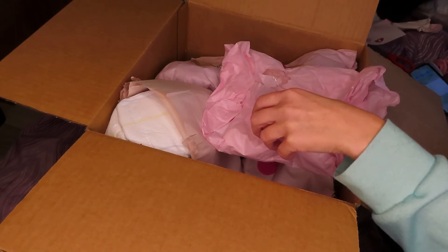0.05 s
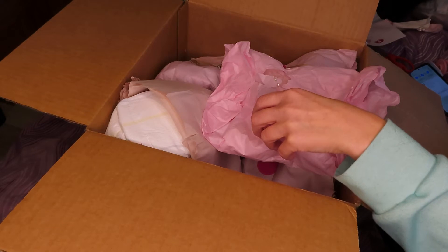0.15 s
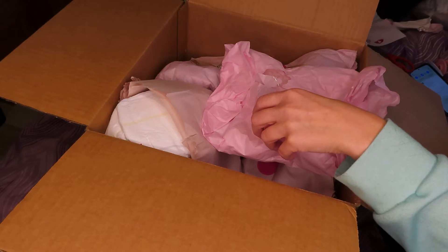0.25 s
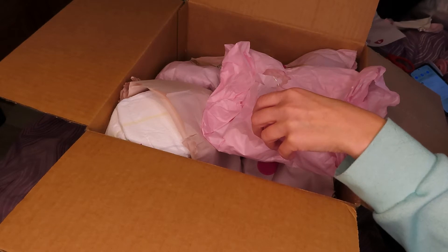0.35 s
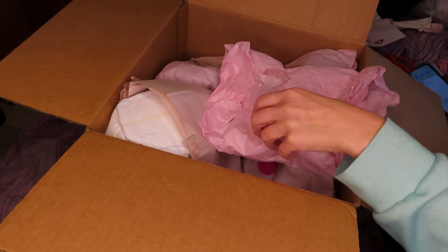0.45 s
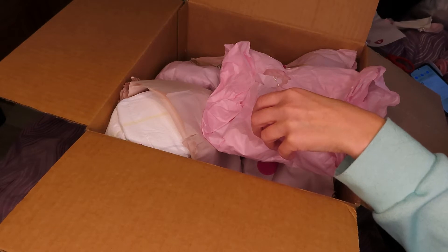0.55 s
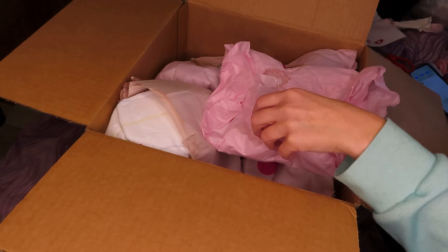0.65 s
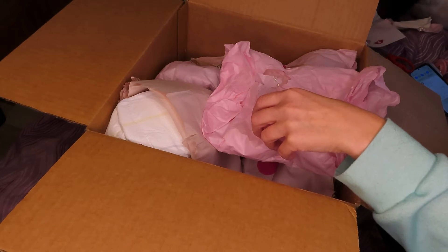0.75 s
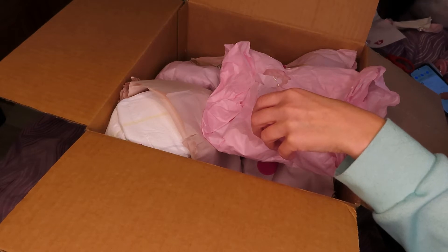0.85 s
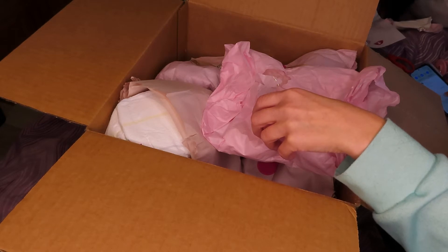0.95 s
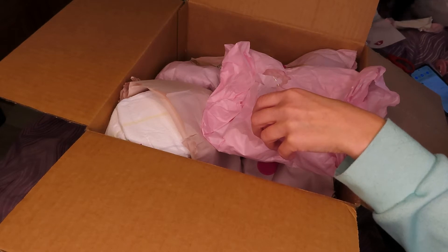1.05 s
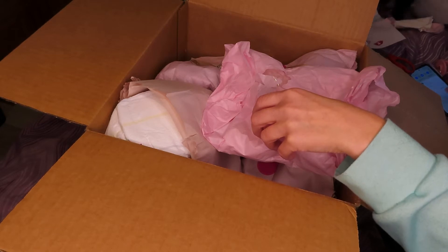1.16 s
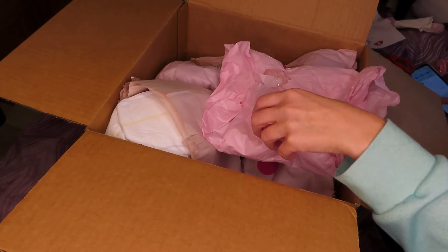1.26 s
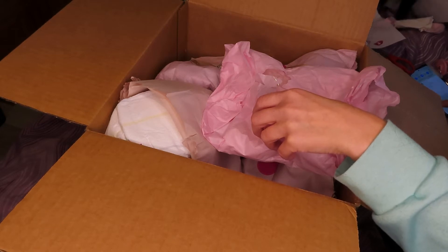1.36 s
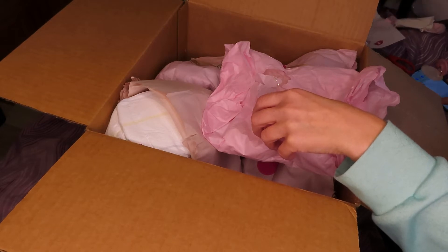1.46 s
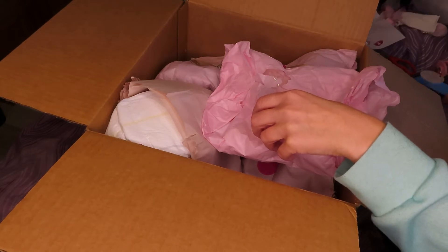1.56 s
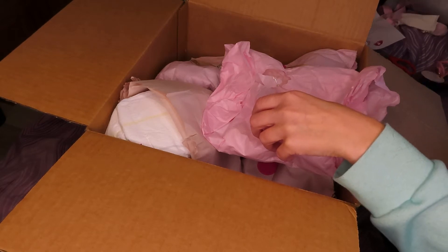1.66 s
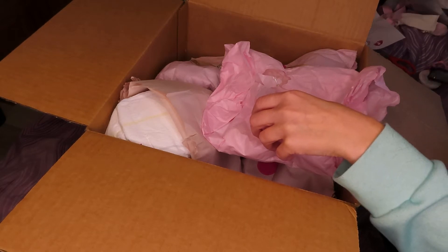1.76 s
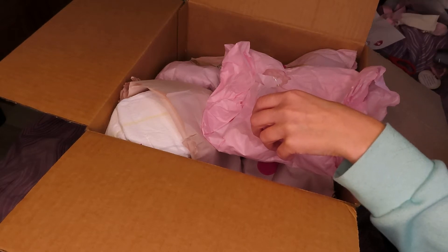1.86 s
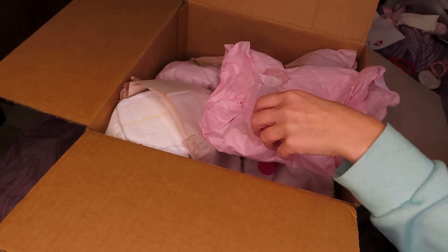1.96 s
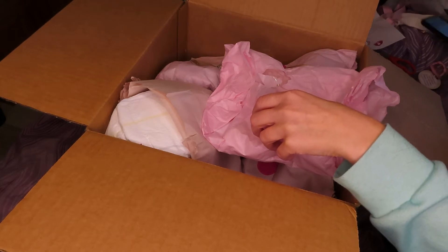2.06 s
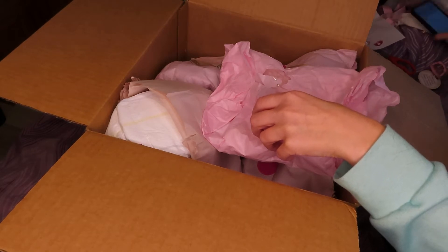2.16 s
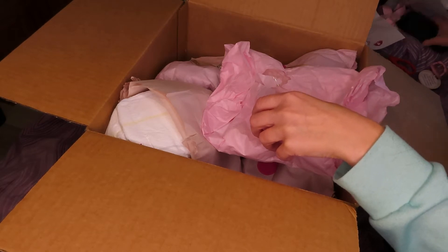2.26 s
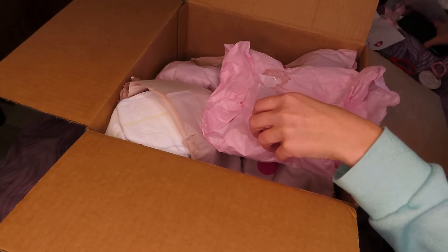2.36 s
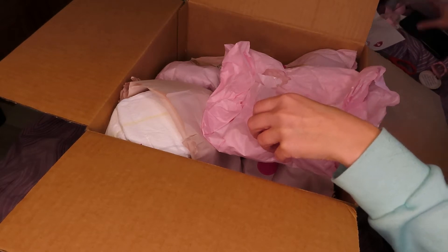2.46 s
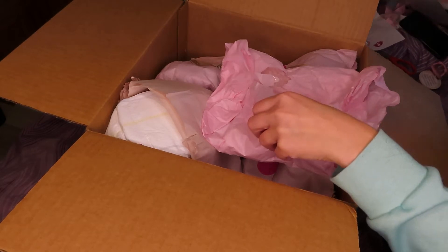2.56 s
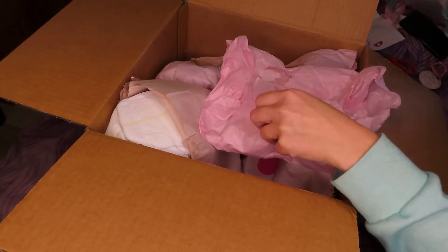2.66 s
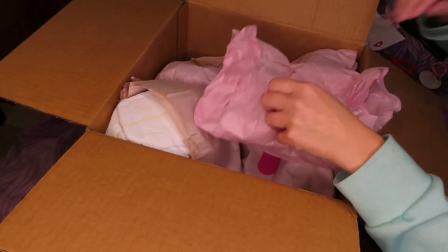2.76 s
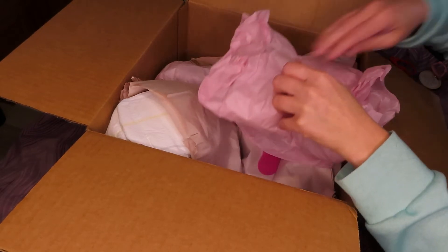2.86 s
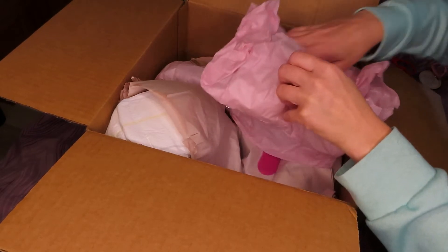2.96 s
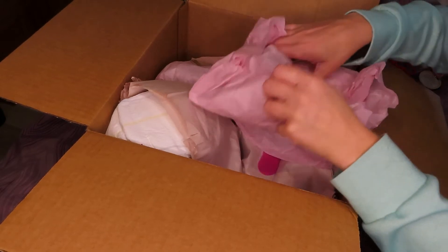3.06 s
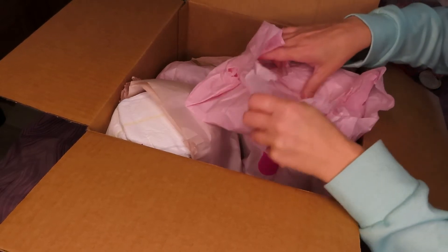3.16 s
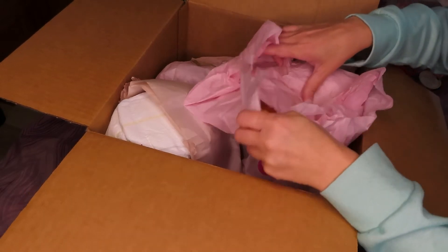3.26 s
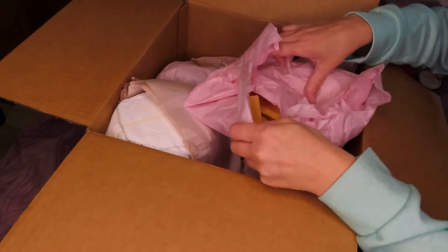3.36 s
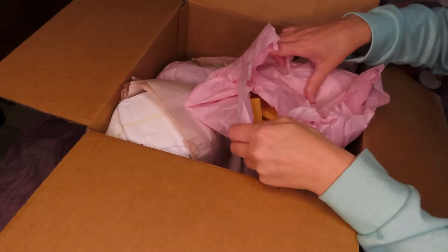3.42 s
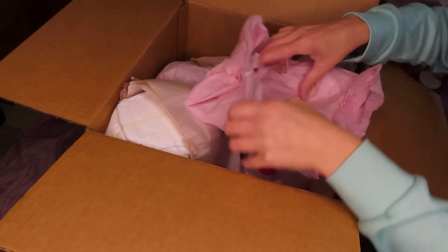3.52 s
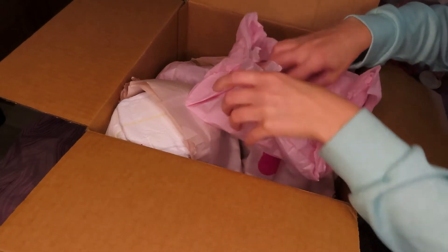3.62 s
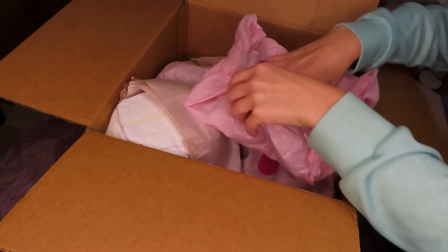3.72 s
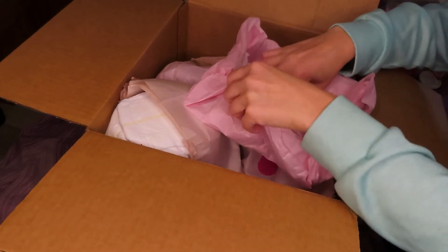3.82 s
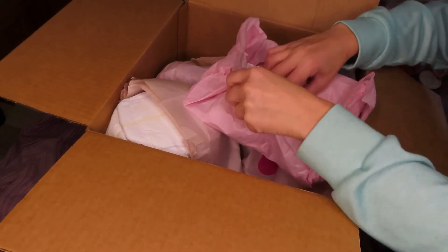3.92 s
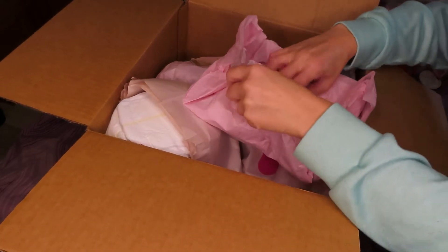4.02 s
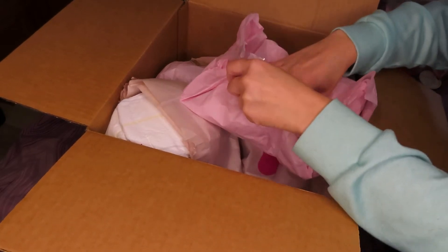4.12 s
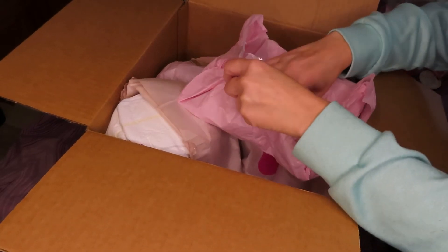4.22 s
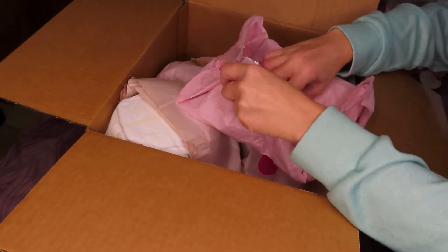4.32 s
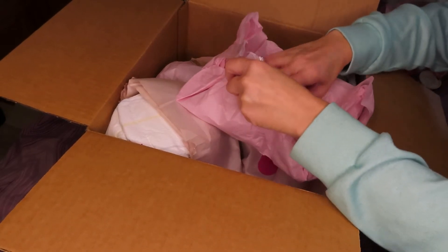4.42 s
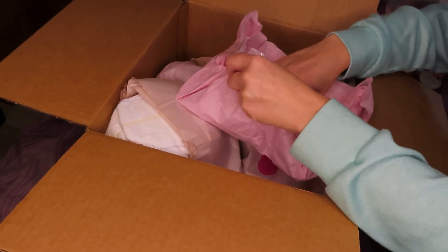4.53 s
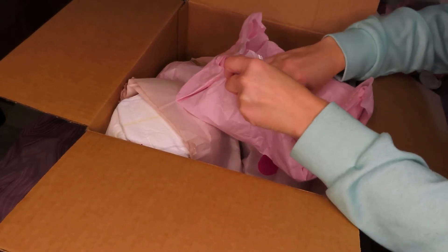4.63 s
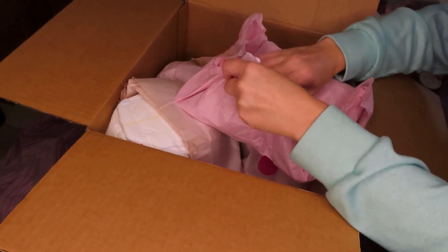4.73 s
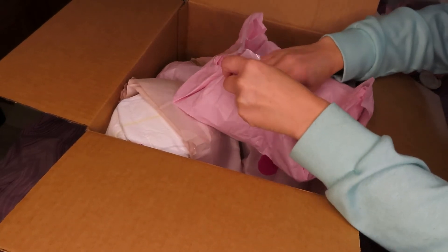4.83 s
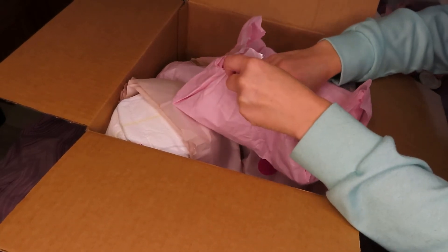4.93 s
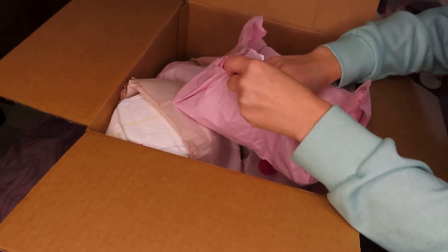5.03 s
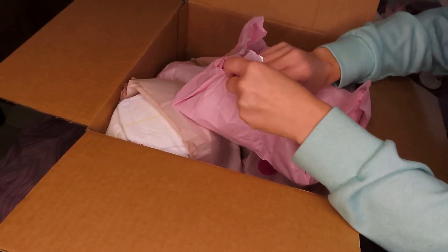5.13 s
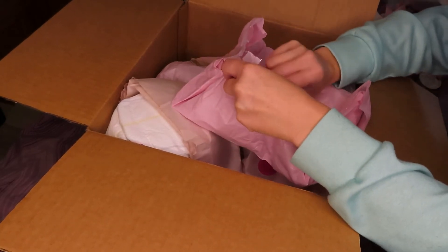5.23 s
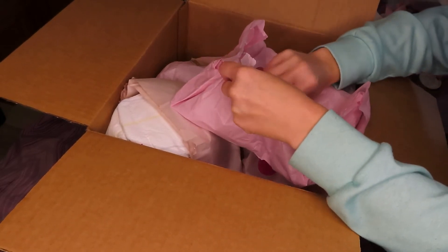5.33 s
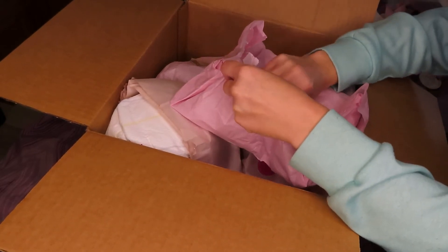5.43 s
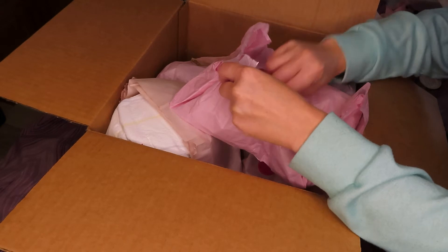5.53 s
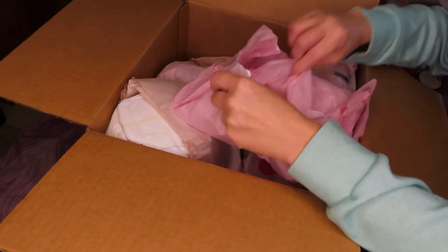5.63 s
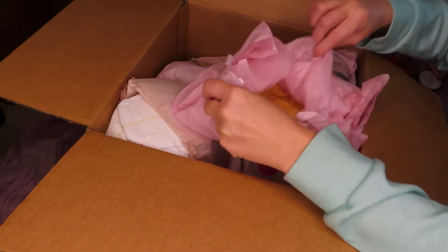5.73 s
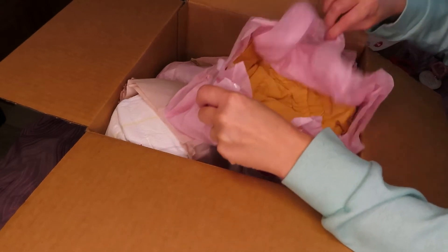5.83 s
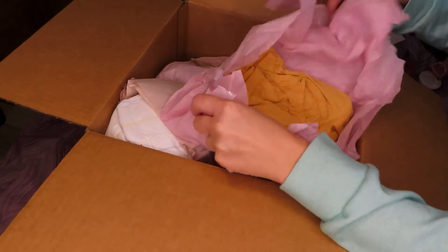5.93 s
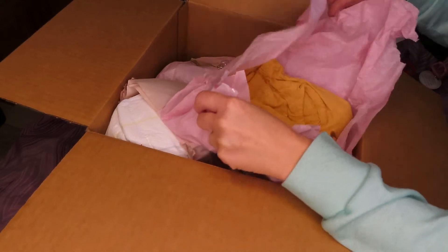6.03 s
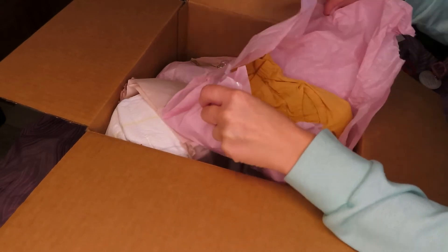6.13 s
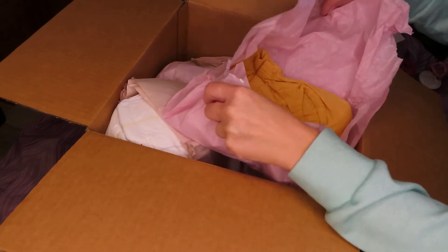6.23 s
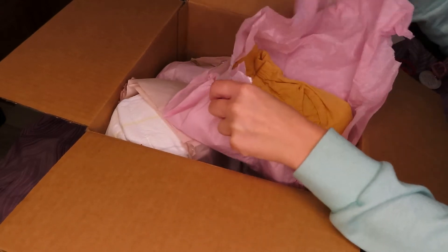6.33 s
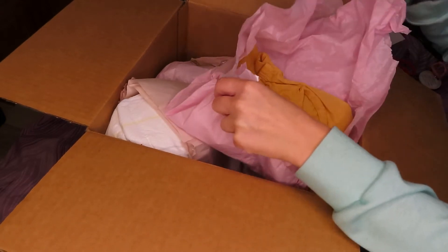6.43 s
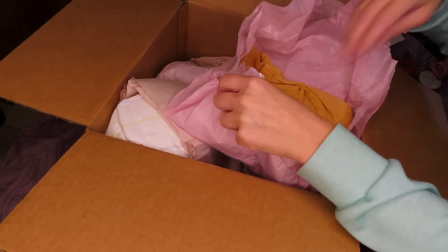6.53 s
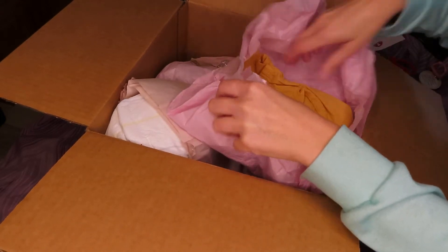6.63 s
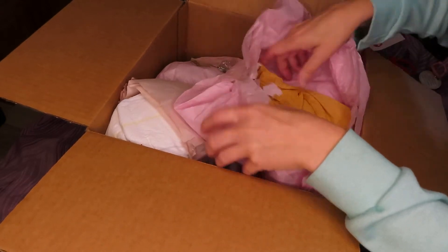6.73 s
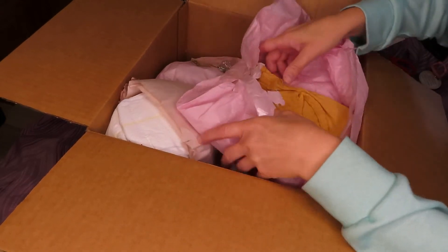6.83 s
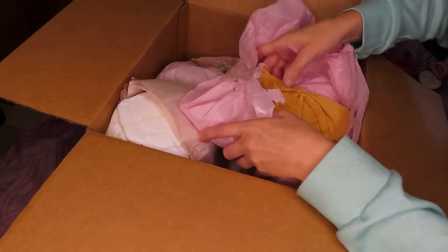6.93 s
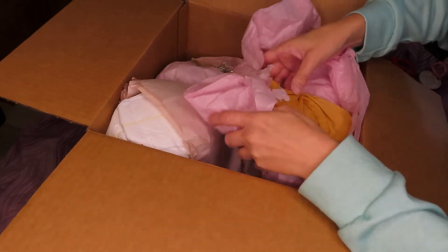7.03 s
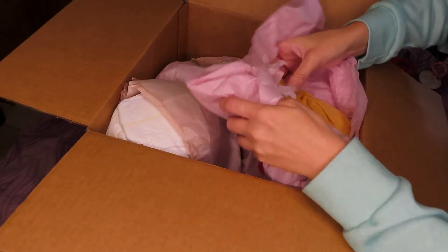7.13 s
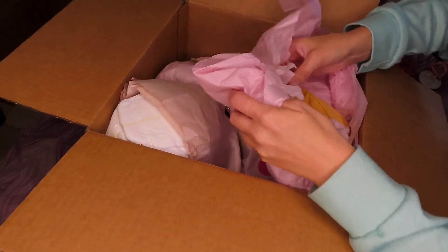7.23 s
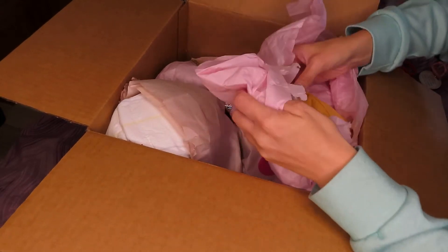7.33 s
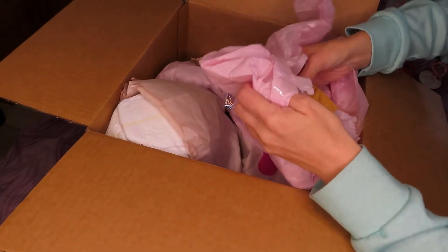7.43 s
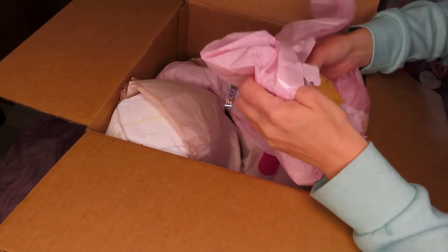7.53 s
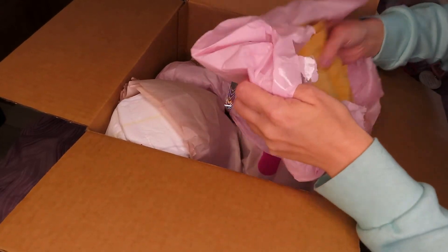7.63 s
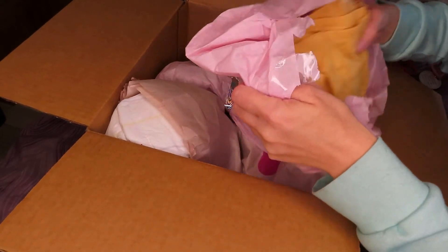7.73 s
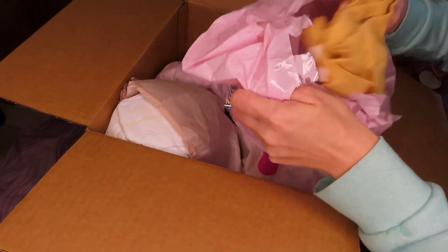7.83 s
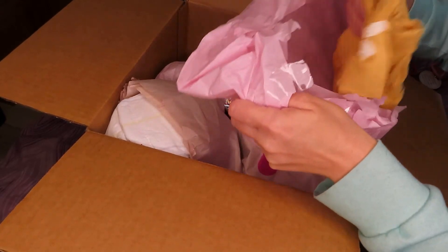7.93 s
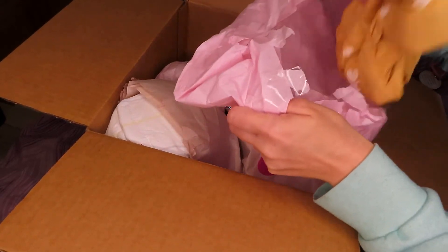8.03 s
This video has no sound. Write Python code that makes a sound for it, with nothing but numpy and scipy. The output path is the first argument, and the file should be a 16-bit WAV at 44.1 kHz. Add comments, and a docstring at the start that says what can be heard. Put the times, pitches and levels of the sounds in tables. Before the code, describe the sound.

In a quiet room with a faint hum and microphone hiss, tissue paper gives a few small crackles and there are some soft, dull knocks. Then hands start pulling and crumpling the paper inside a cardboard box, and it rustles loudly in one burst after another, dotted with crisp snaps, up to the end. The sound is close, with very little echo.

```python
"""A close rustle of tissue paper, crumpled and pulled by hand in a cardboard box, indoors.
Creases buckle in clumps, each a short burst, dull or bright; a few snap out singly.
Box and room smear the bursts together. A few dull bumps sound nearby.
Microphone hiss and a faint room hum lie under all."""
import sys
import numpy as np
from scipy import signal
from scipy.fft import rfft, irfft, next_fast_len
from scipy.io import wavfile
from scipy.ndimage import map_coordinates

SR = 44100
rng = np.random.default_rng(int(sys.argv[2]) if len(sys.argv) > 2 else 0)


def log_audio(samples):
    """Write samples as a 16-bit WAV file to the path given in sys.argv[1]."""
    # one column per channel
    frames = np.atleast_2d(samples).T
    # limit to full scale, then quantise
    limited = np.clip(frames, -1, 1)
    pcm = np.round(limited * 32767).astype(np.int16)
    wavfile.write(sys.argv[1], SR, pcm)


N = 356230

# Grips and pulls: full_at_s, hold_s, crackle_db, swell_s, fade_s, body_re_crackle_db, fizz_re_crackle_db
GRIPS = [(1.6, 0.025, -43.5, 0.049, 0.16, -6, -10.5), (1.765, 0.0084, -51.5, .08, 0.042, -5, -12),
         (1.845, .01, -48.5, .05, .2, -12, -17), (2.45, 0.062, -43, 0.13, .1, -3.5, -13),
         (2.545, .05, -36, 0.031, .3, -6, -7), (2.65, 0.019, -28.5, 0.12, 0.15, -7, -8.5),
         (2.8, 0.056, -24, 0.27, 0.3, -6, -7), (3.029, 0.07, -14, .06, 0.11, -7.5, -6.5),
         (3.19, .03, -18, 0.15, .4, -7.5, -6), (3.329, 0.029, -18.5, 0.073, 0.11, -6, -5.5),
         (3.58, 0.062, -23.5, 0.18, 0.061, -8, -5.5), (3.779, 0.1, -21, 0.19, 0.095, -5.5, -7),
         (3.95, 0.11, -27.5, 0.29, 0.4, -5.5, -7), (4.119, .17, -22.5, 0.11, 0.22, -5.5, -8),
         (4.508, .18, -23, 0.084, 0.13, -5, -8), (4.78, 0.017, -33, .2, 0.24, -8, -8),
         (4.919, 0.067, -22.5, 0.19, 0.21, -6, -8.5), (5.14, .02, -28, 0.055, 0.15, -7, -7.5),
         (5.33, .01, -35.5, 0.17, 0.062, -3, -2), (5.421, 0.059, -25.5, 0.16, .15, -6, -9),
         (5.66, 0.19, -16, 0.14, 0.26, -8, -7), (5.92, 0.096, -19.5, 0.18, 0.24, -7.5, -5.5),
         (6.055, 0.034, -20, .08, 0.053, -9.5, -4.5), (6.12, 0.053, -24, .05, 0.31, -10, -7),
         (6.35, 0.067, -25.5, 0.12, 0.076, -8.5, -6.5), (6.481, 0.038, -35.5, 0.13, 0.12, -4, -9),
         (6.63, .05, -31, 0.047, .08, -7.5, -9), (6.715, .12, -21, 0.042, 0.43, -6, -5.5),
         (6.92, .12, -21.5, 0.26, 0.57, -6, -8.5), (7.22, 0.063, -18, 0.37, 0.38, -7.5, -6.5),
         (7.55, 0.084, -26, 0.52, 0.77, -6.5, -11.5), (7.758, 0.043, -20.5, 0.53, 0.32, -8.5, -6),
         (8.02, .06, -26, 0.38, .3, -11, -7)]
# Single loud creases: start_s, ring_db, tick_db, pitch_hz
SNAPS = [(0.5277, -33, -57, 2680), (1.1302, -44, -40, 1730), (1.1954, -52, -44, 2130),
         (1.5892, -33, -42, 2750), (1.685, -37, -39, 1020), (1.723, -35, -43, 1880),
         (1.7593, -33, -51, 3000), (1.844, -35, -47, 1490), (2.289, -31, -44, 2730),
         (2.3286, -35, -44, 2800), (2.3555, -23.5, -34, 2650), (2.387, -31.5, -36, 1150),
         (2.4002, -26, -35, 2016), (2.4513, -22, -28, 1870), (2.502, -23, -23, 2090),
         (2.54, -17, -32, 2380), (2.645, -17, -20, 2400), (2.7266, -13.5, -19, 2530),
         (2.7896, -7.5, -16, 2570), (3.0049, -7, -7.5, 2170), (3.038, -3, -8, 2380),
         (3.0959, 2.5, -6, 2420), (3.3184, 0.5, -4, 1020), (3.3194, 0, -6, 2370), (3.3226, 0, -5.5, 900),
         (3.3263, -2, -5, 2950), (3.5034, -20, -34, 2060), (3.7482, -13, -16, 1060),
         (3.95, -16.5, -34, 1186), (3.987, -11, -22, 2750), (4.0822, -10.5, -13.5, 1160),
         (4.118, -7.5, -17, 1860), (4.2655, -13, -11.5, 1680), (4.337, -13.5, -26, 2420),
         (4.4782, -18, -19, 1170), (4.572, -12, -18, 1060), (4.609, -11, -21, 1820),
         (4.6478, -9.5, -21, 1780), (4.6969, -11, -35, 2770), (4.776, -18, -25.5, 1150),
         (4.8468, -14, -21, 2420), (4.891, -16.5, -22, 935), (4.9544, -12, -17, 2840),
         (5.002, -12, -29, 2520), (5.2709, -22.5, -24, 2280), (5.327, -14, -31, 1980),
         (5.3762, -18, -19.5, 1040), (5.4208, -13, -14, 2290), (6.0443, -1, -14, 2700),
         (6.083, -16, -9, 2150), (6.0873, -2.5, -21, 2660), (6.094, -5, -22, 2500),
         (6.1315, -12, -11.5, 2450), (6.2363, -10.5, -27, 2170), (6.4262, -14.5, -27, 2120),
         (6.4512, -20, -23, 2500), (6.5037, -25, -17, 1570), (6.566, -13, -19, 1500),
         (6.5814, -16, -18, 2030), (6.617, -14.5, -22, 3000), (6.9302, -7.5, -11, 2040),
         (7.4877, -13, -29, 1907), (7.86, -12.5, -14, 1702), (7.902, -9, -16, 2620)]
# Sheet colour: freq_hz, relative_db
PAPER_SPECTRUM = [(30, -28), (90, -16), (300, -9), (520, -9), (860, -4), (1500, 3), (2300, 7), (3300, 1),
                  (4700, -11), (6000, -8), (8500, -6.5), (12200, -12.5), (13800, -22), (15800, -28.5)]
# Soft knocks: start_s, level_db, t60_s, centre_hz
BUMPS = [(1.358, -28.5, 0.098, 205), (1.655, -31.5, 0.093, 146), (1.93, -45.5, 0.2, 183),
         (2.665, -19, 0.065, 227), (3.319, -20, 0.064, 305)]
# Modes rung by a knock: pitch_hz
BUMP_MODES_HZ = [121, 154, 221, 247, 320, 440]
# Box and room decay: freq_hz, t60_s
ROOM_DECAY = [(200, 0.19), (2000, 0.083), (10000, 0.15)]
# Rustle not shared by the two microphone ports: freq_hz, gain_db
SIDE_GAIN = [(60, -42), (300, -24), (950, -119), (2300, -83), (3500, -13), (4800, -6.5), (6200, -11),
             (9000, -9.5), (11500, -11), (13000, -7), (14500, -3.5)]
# Phase lead of the right port: freq_hz, lead_rad
RIGHT_LEAD = [(3000, 0), (4800, .3), (6200, .35), (9000, .7), (11500, .4), (13000, .8), (14500, 2.3)]
# Hiss colour: freq_hz, relative_db
HISS_SPECTRUM = [(12, -43), (20, -12), (44, -8.5), (104, -7.5), (145, -6), (203, -9.5), (240, -8.5),
                 (276, -5.5), (866, -17.5), (1020, -15), (3220, -20.5), (11600, -35.5), (15800, -43)]
# Left-right likeness of the hiss: freq_hz, correlation
HISS_COHERENCE = [(60, 1), (130, 0.84), (290, 0.16), (1400, 0.45), (15000, .02)]
# Room hum, narrow peaks in the hiss: centre_hz, width_hz, strength_db
HUM_BANDS = [(553, 34, 6.5), (853, 102, 9.5)]


def paper():
    """Buckles and sheet-on-sheet sliding gate six noise bands; snaps add on top. Returns mid, side."""
    level_db = handling_db()
    # harder handling, more buckles
    rate_per_s = np.clip(1300 * amp(0.96 * (level_db[1] + 29)), 150, 6000)
    spread_db = np.c_[[2.2, 2.1, 2.3, 2.1, 3.1, 3.5]]  # spikier treble
    swarm = creases(rate_per_s, spread_db, clump_db=3, colour_db=2.5, t60_s=0.012)
    slide_share = np.c_[[0.4, 0.45, 0.4, 0.45, 0.25, 0.22]]
    drift_db = 0.42 * np.array([wobble(11) for _ in slide_share])  # other folds take over
    energy = amp(2 * (np.repeat(level_db, 2, axis=0) + drift_db))
    energy *= slide_share + (1 - slide_share) * swarm
    ring, trail, tick = snaps(decay_cycles=2.4, tick_t60_s=0.009, trail_t60_s=0.019)
    energy[1:4] += trail
    energy[4:] += tick
    bursts = np.sqrt(energy) * rng.standard_normal((2, 1, N))
    mid, side = causal_filter(bursts, paper_bands).sum(axis=1)
    return mid + ring, side


def handling_db():
    """Body, crackle and fizz levels: each grip swells, holds and fades; overlaps add in energy."""
    full_at_s, hold_s, crackle_db, swell_s, fade_s, body_db, fizz_db = np.transpose(GRIPS)[:, :, None]
    t = np.arange(0, N / SR + 0.004, 0.002)
    early = np.maximum(full_at_s - t, 0) / swell_s
    late = np.maximum(t - full_at_s - hold_s, 0) / fade_s
    grip = amp(2 * (crackle_db - 20 * (early + late)))  # 20 dB per swell or fade time
    energies = [np.sum(grip * amp(2 * band_db), axis=0) for band_db in (body_db, 0, fizz_db)]
    return np.array([np.interp(np.arange(N) / SR, t, 10 * np.log10(e + 1e-12)) for e in energies])


def creases(rate_per_s, spread_db, clump_db, colour_db, t60_s):
    """Small buckles set off their neighbours in clumps. Returns energy per band, mean 1."""
    dice = rng.random(N)
    size_db = np.minimum(rng.exponential(size=N), 5) * spread_db  # many tiny, few large
    tint_db = colour_db * rng.standard_normal((6, N))
    clumping = amp(clump_db * (wobble(30) + wobble(90)))
    buckles = dice < rate_per_s / SR * clumping
    impulses = buckles * amp(2 * (size_db + tint_db)) / rate_per_s
    pole = amp(-120 / (t60_s * SR))
    energy = signal.lfilter([1 - pole], [1, -pole], impulses)
    return energy / energy.mean(axis=1, keepdims=True)


def snaps(decay_cycles, tick_t60_s, trail_t60_s):
    """A loud crease rings a facet briefly. Returns ring, trailing crackle energy, bright tick energy."""
    ring, trail, tick = np.zeros((3, N + SR))
    t = np.arange(SR // 20) / SR
    for (start_s, ring_db, tick_db, pitch_hz), dice in zip(SNAPS, rng.random((len(SNAPS), 5))):
        ratios = (1, 1.135 + 0.44 * dice[0], 0.543 + 0.26 * dice[1])
        facet = sum(gain * np.sin(2 * np.pi * (pitch_hz * ratio * t + phase))
                    for ratio, gain, phase in zip(ratios, (1, 0.45, 0.5), dice[2:]))
        age = t * pitch_hz / decay_cycles
        span = round(start_s * SR) + np.arange(len(t))
        ring[span] += amp(ring_db) * (1 - np.exp(-3 * age)) * np.exp(-age) * facet
        trail[span] += amp(2 * (ring_db - 14 - 60 * t / trail_t60_s))
        tick[span] += amp(2 * (tick_db - 60 * t / tick_t60_s)) * (1 - np.exp(-t / 0.0011))
    ring = fft_filter(ring[:N], lambda hz: 1 / (1 + (350 / (hz + 1)) ** 4))  # thin sheet: no bass
    return ring, trail[:N], tick[:N]


def paper_bands(hz):
    """Sheet colour in six bands; each pair (body, crackle, fizz) has unit power."""
    lowpasses = [1 / (1 + (hz / edge_hz) ** 10) for edge_hz in (750, 1400, 2500, 4500, 8500)]
    band_share = np.abs(np.diff(lowpasses, axis=0, prepend=0, append=1))
    gain = amp(log_interp(PAPER_SPECTRUM, hz)) * np.sqrt(band_share)
    pair_power = np.mean(gain ** 2, axis=1).reshape(-1, 2).sum(axis=1)
    return gain / np.sqrt(np.repeat(pair_power, 2))[:, None]


def bumps():
    """Soft knocks ring the low modes nearest each blow's own pitch."""
    out = np.zeros(N + SR)
    t = np.arange(SR // 2) / SR
    for start_s, level_db, t60_s, centre_hz in BUMPS:
        ring = sum(amp(-9 * np.log2(hz / centre_hz) ** 2) * np.sin(2 * np.pi * hz * t)
                   for hz in BUMP_MODES_HZ)
        envelope = amp(level_db - 3.5 - 60 * t / t60_s) * (1 - np.exp(-t / 0.006))
        out[round(start_s * SR):][:len(t)] += envelope * ring
    return out[:N]


def room(x):
    """Box and room reverberation: each frequency dies at its own rate."""
    hz, t, spectra = signal.stft(rng.standard_normal(SR // 2), SR, nperseg=256)
    decay = amp(-60 * t / log_interp(ROOM_DECAY, hz)[:, None])
    tail = signal.istft(spectra * decay, SR, nperseg=256)[1]
    return signal.fftconvolve(np.pad(x, (150, 0)), tail / np.linalg.norm(tail))[:N]


def microphone_ports(mid, side):
    """Two close ports: alike in the bass; in the treble they part and the right leads."""
    sign = np.array([[1], [-1]])
    pair = mid + sign * fft_filter(side, lambda hz: amp(log_interp(SIDE_GAIN, hz)))
    return fft_filter(pair, lambda hz: np.exp(-0.5j * sign * log_interp(RIGHT_LEAD, hz)))


def hiss_and_hum(mid_rms_db):
    """Microphone hiss, most alike left and right in the bass, with two bands of room hum."""
    def colour(hz):
        width_rad = np.arccos(log_interp(HISS_COHERENCE, hz)) / 2
        hum = 1 + sum(amp(strength_db) / (1 + (2 * (hz - centre_hz) / width_hz) ** 2)
                      for centre_hz, width_hz, strength_db in HUM_BANDS)
        return amp(log_interp(HISS_SPECTRUM, hz)) * hum * [np.cos(width_rad), np.sin(width_rad)]
    mid, side = causal_filter(rng.standard_normal((2, N)), colour)
    gain = amp(mid_rms_db + 0.19 * wobble(7.9)) / np.sqrt(np.mean(mid ** 2))
    return gain * np.array([mid + side, mid - side])


def amp(db):
    """dB to amplitude; amp(2 * db) is energy."""
    return 10 ** (np.asarray(db) / 20)


def log_interp(points, hz):
    """Table lookup on a log frequency axis."""
    freq_hz, values = np.transpose(points)
    return np.interp(np.log(hz + 1), np.log(freq_hz + 1), values)


def wobble(knots_per_s):
    """Smooth random curve."""
    knots = rng.standard_normal(int(N * knots_per_s / SR) + 4)
    return map_coordinates(knots, [np.arange(N) * knots_per_s / SR])


def causal_filter(x, gain):
    """Minimum-phase filter of magnitude gain(hz)."""
    size = 2 * next_fast_len(N // 2 + 4096, real=True)
    cepstrum = irfft(np.log(gain(np.fft.rfftfreq(size, 1 / SR)) + 1e-6), size)
    cepstrum[..., 1:size // 2] *= 2
    cepstrum[..., size // 2 + 1:] = 0
    return irfft(rfft(x, size) * np.exp(rfft(cepstrum)), size)[..., :N]


def fft_filter(x, response):
    """Apply a complex response(hz)."""
    size = next_fast_len(N + 4096, real=True)
    return irfft(rfft(x, size) * response(np.fft.rfftfreq(size, 1 / SR)), size)[..., :N]


def scene():
    """Paper and bumps in the room, over hiss and hum."""
    rustle, side = paper()
    knocks = bumps()
    mid = rustle + amp(-13.5) * room(rustle) + knocks + room(knocks)
    balance_db = [[-0.15], [0.15]]
    return microphone_ports(mid, side) * amp(balance_db) + hiss_and_hum(mid_rms_db=-51)


def record(dry):
    """Soft clip of the loudest peaks, then a band limit."""
    clipped = dry / (1 + np.abs(dry) ** 8) ** (1 / 8)
    return fft_filter(clipped, lambda hz: hz < 15760)


dry = scene()
out = record(dry)
log_audio(out)
```